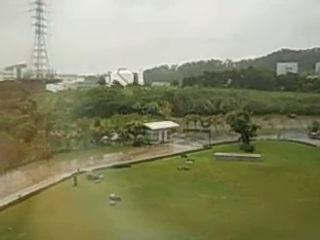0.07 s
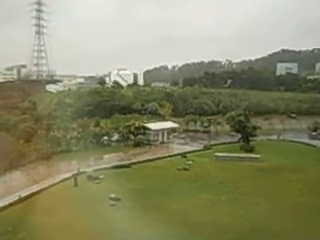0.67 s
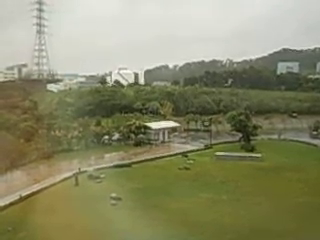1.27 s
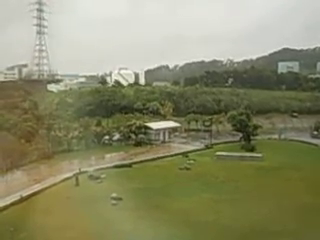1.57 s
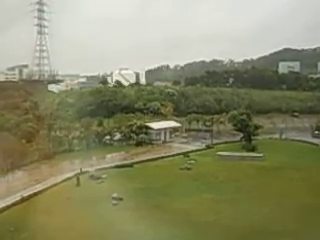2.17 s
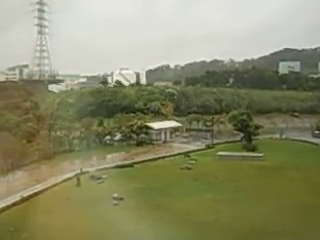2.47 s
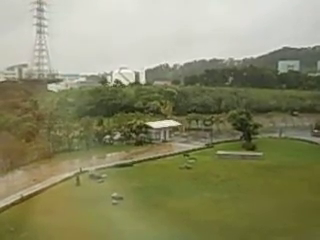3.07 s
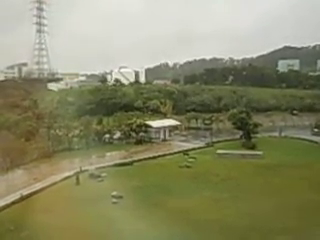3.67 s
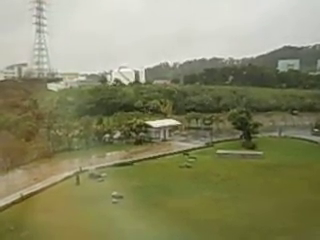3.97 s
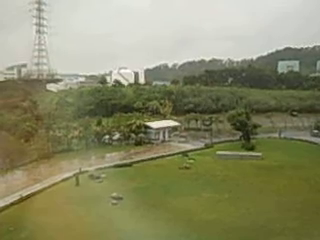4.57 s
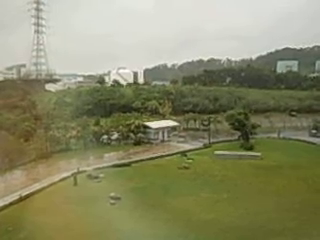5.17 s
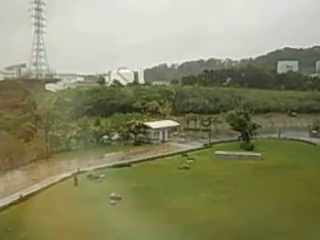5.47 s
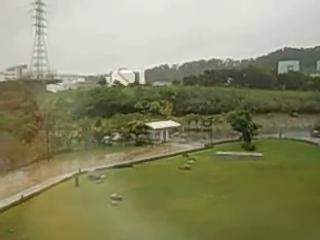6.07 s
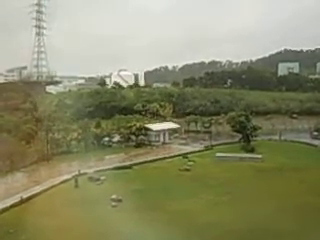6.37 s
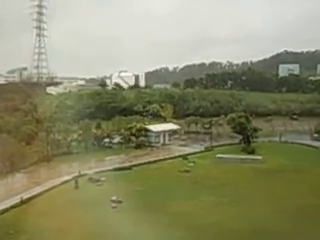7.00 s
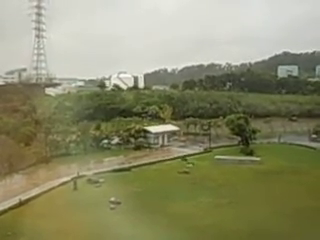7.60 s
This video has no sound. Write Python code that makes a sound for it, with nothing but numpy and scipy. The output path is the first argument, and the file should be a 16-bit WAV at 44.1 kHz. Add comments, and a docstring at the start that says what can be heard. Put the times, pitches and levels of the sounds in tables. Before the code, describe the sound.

Muffled wind and rain wash on outside while stray drops tick against the glass and something small snaps loudly nearby.

```python
"""Behind a window facing a lawn, steady rain and wind are heard through a narrow band, the treble lost above
about 4 kHz. One slowly easing gust drives both the low rush of wind in the trees and the wash and patter of
rain. Stray drops knock on the pane and sill and burst into spray, while a machine whines faintly. Close to the
microphone a small hard part snaps once, and the click overloads the recorder."""
import sys
import numpy as np
from scipy import signal
from scipy.fft import rfft, irfft
from scipy.io import wavfile
from scipy.ndimage import uniform_filter1d

SR = 44100
rng = np.random.default_rng(int(sys.argv[2]) if len(sys.argv) > 2 else 0)


def int16_out(signal):
    """Quantize to a 16-bit WAV file."""
    q = np.round(np.clip(np.atleast_2d(signal).T, -1, 1) * 32767)
    wavfile.write(sys.argv[1], SR, q.astype(np.int16))


N = 345744
T = np.arange(N) / SR
HZ = np.maximum(np.fft.rfftfreq(N, 1 / SR), 1)


def undb(db):
    """Decibels to gain."""
    return 10 ** (np.asarray(db) / 20)


def unit(x):
    """Scale to rms 1."""
    return x / np.sqrt(np.mean(x ** 2))


def colour(x, points):
    """Equalise along a curve of (Hz, dB) points."""
    hz, db = np.transpose(points)
    return irfft(rfft(x) * undb(np.interp(np.log(HZ), np.log(hz), db)), N)


def resonate(x, hz, width_hz):
    """Two-pole resonance, gain 1 at the centre."""
    return signal.lfilter(*signal.iirpeak(hz, hz / width_hz, fs=SR), x)


def cut(x, hz, kind):
    """Two-pole Butterworth low-pass or high-pass."""
    return signal.sosfilt(signal.butter(2, hz, kind, fs=SR, output="sos"), x)


def drift(rate_hz):
    """A smooth random modulator: held steps, slewed twice, with a spread near 1."""
    hold = int(SR / rate_hz)
    steps = rng.standard_normal(N)[np.arange(N) // hold]
    return 1.3 * uniform_filter1d(uniform_filter1d(steps, hold), hold)


def flutter(x, rate_hz, depth_db, count=7):
    """Let each octave band, from 60 Hz up, waver in level on its own."""
    octave = np.clip(np.log2(HZ / 60), 0, count - 1)
    spectrum = rfft(x)
    bands = (irfft(spectrum * np.maximum(1 - abs(octave - k), 0), N) for k in range(count))
    return sum(band * undb(depth_db * drift(rate_hz)) for band in bands)


def add(out, start_s, sound):
    """Mix a short sound in at its start time."""
    start = int(start_s * SR)
    out[start:start + len(sound)] += sound[:N - start]


def window(x):
    """The pane and the room resonate, lifting a few narrow bands of the weather outside."""
    # Each row: centre in Hz, width in Hz, level of the added resonance in dB.
    resonances = [(386, 28, -15.5), (513, 40, -9.5), (603, 25, -9.5), (710, 30, -16.5), (930, 70, -12.5),
                  (1070, 70, -11.5)]
    return x + sum(undb(db) * resonate(x, hz, width) for hz, width, db in resonances)


def wind(gust_db, split_hz=260):
    """Turbulent air in the trees; gusts lift the upper rush more than the rumble beneath."""
    # The wind's tone, dulled by the window. Each row: frequency in Hz, relative level in dB.
    wind_tone = [(20, -56.5), (50, -30.5), (100, -15.5), (160, -3), (230, 0), (310, 2), (440, -9.5),
                 (600, -4.5), (850, -11.5), (1100, -14.5), (1400, -24.5), (3000, -44)]
    turbulence = flutter(rng.standard_normal(N), rate_hz=9, depth_db=1.07)
    air = unit(window(colour(turbulence, wind_tone)))
    rumble = irfft(rfft(air) / (1 + (HZ / split_hz) ** 4), N)
    rush = air - rumble
    swell_db = gust_db - gust_db.mean()
    return undb(gust_db.mean()) * (rumble * undb(0.44 * swell_db) + rush * undb(1.3 * swell_db))


def rain(drops_per_s=500, spread_db=3.5, patter_db=-9, smear_s=0.0023):
    """Countless far drops merge to a wash; nearer ones stand out as a soft patter."""
    # The tone of rain on the grounds. Each row: frequency in Hz, relative level in dB.
    rain_tone = [(200, -17.5), (370, 10.5), (700, 4), (860, 3.5), (1090, 7.5), (1200, 1), (1400, 0),
                 (1650, 2.5), (2080, -3), (2400, 1), (2680, 2), (3050, -2), (3350, -8), (3700, -15.5)]
    impacts = rng.random(N) < drops_per_s / SR
    sizes = undb(spread_db * np.minimum(rng.exponential(size=N), 5))
    # each impact sprays for a moment
    spray_envelope = signal.lfilter([1], [1, -np.exp(-1 / (smear_s * SR))], impacts * sizes)
    patter = unit(spray_envelope * rng.standard_normal(N))
    wash = flutter(rng.standard_normal(N), rate_hz=12, depth_db=0.75)
    return unit(window(colour(wash + undb(patter_db) * patter, rain_tone)))


def machine_whine(wander_hz=2.58, waver_db=1.5):
    """A machine in the building gives off thin tones, slightly unsteady in level and pitch."""
    # Each row: pitch in Hz, level in dB.
    tones = [(317, -57), (538, -52.5), (720, -57.5), (1280, -55.5), (3540, -69)]
    out = np.zeros(N)
    for hz, db in tones:
        gain = undb(db + waver_db * drift(3.6))
        pitch_hz = hz + wander_hz * drift(25)
        out += gain * np.sin(2 * np.pi * np.cumsum(pitch_hz) / SR)
    return out


def light_drops(gust_db, per_s=1.8, above_gust_db=1, spread_db=1.5, count=30):
    """Random extra rows for window_drops; the gust throws these drops harder against the pane."""
    starts = np.cumsum(rng.exponential(size=count)) / per_s
    rows = []
    for start_s, (softness, pitch) in zip(starts, rng.standard_normal((count, 2))):
        if start_s < T[-1]:
            db = gust_db[int(start_s * SR)] + above_gust_db - spread_db * softness
            rows.append((start_s, db, 500 * 2 ** (0.3 * pitch), 0))
    return rows


def window_drops(gust_db, scatter=0.19, thud_width_hz=370):
    """Each drop knocks the pane or sill into a brief ring and bursts into a brighter spray."""
    # The heaviest nearby drops. Each row: start in seconds, peak of the thud in dB,
    # pitch of the thud in Hz, spray level against the thud in dB.
    heavy_drops = [(0.628, -33, 460, 3), (1.467, -35.5, 450, 10), (1.683, -19, 410, -19),
                   (1.939, -31, 319, 9.5), (3.035, -28, 1100, 4), (3.682, -21.5, 850, -11),
                   (4.111, -30, 500, -4), (4.504, -27, 348, -1), (4.582, -16.5, 757, -11.5),
                   (5.044, -33, 510, 3.5), (5.093, -26.5, 644, -15), (5.284, -36, 576, 3.5),
                   (5.371, -26, 896, -9), (5.425, -20, 790, -24), (7.785, -37, 494, 7)]
    # The ring of pane and sill. Each row: centre in Hz, width in Hz, relative level in dB.
    sill_modes = [(360, 49, -4), (417, 170, -1), (611, 100, -2.5), (782, 64, -5), (976, 54, 1),
                  (1124, 64, -3), (1430, 220, -4.5), (1820, 190, 0)]
    # The tone of a bursting drop. Each row: frequency in Hz, relative level in dB.
    spray_tone = [(600, -26.5), (1300, -12.5), (1900, 2.5), (2200, -1), (2450, 4), (2950, 1.5),
                  (3400, -8.5), (3900, -23.5)]
    out, t = np.zeros(N), T[:SR // 10]
    hiss = colour(rng.standard_normal(N), spray_tone)
    for start_s, db, hz, spray_db in heavy_drops + light_drops(gust_db):
        splash_s = 0.0066 * 2 ** ((db + 32) / 20)  # a drop 20 dB louder splashes twice as long
        fade = np.exp(-t / splash_s)
        # one blow, then the water scatters over the surface
        force = (t == 0) + scatter * fade * rng.standard_normal(len(t))
        force = resonate(resonate(force, hz, thud_width_hz), hz, 2 * thud_width_hz)
        thud = sum(undb(mode_db) * resonate(force, mode_hz, width)
                   for mode_hz, width, mode_db in sill_modes)
        spray = fade * np.roll(hiss, int(start_s * SR))[:len(t)]
        tap = thud / abs(thud).max() + undb(spray_db) * spray / abs(spray).max()
        add(out, start_s, undb(db) * tap)
    return out


def click():
    """A small hard part strikes, seats and settles, ringing briefly at each contact."""
    # Each row: start in seconds, gain in dB, brightness as a low-pass cutoff in Hz.
    contacts = [(4.6798, -2.5, 3600), (4.6810, 1.5, 4500), (4.6818, -12, 4490), (4.6857, -7, 1100)]
    # The part's ring. Each row: pitch in Hz, relative level in dB, seconds to fade by 60 dB.
    modes = [(350, -18, 0.0351), (625, -24, 0.027), (1180, -22.5, 0.06), (1354, -10, 0.039),
             (1764, -13, 0.02), (2130, -5.5, 0.017), (2300, -8, 0.014), (2770, -0.5, 0.013),
             (3090, -22.5, 0.054), (3600, -17.5, 0.016)]
    out, t = np.zeros(N), T[:SR // 10]
    ring = sum(undb(db - 60 * t / t60) * np.cos(2 * np.pi * hz * t) for hz, db, t60 in modes)
    for start_s, db, cutoff_hz in contacts:
        add(out, start_s, undb(db) * cut(ring, cutoff_hz, "low"))
    return cut(out, 300, "high")  # too small to radiate bass


def scene(wind_trim_db=-1.21, rain_trim_db=-4, rain_swell=1.25):
    """Wind and rain ride the same gust; whine, drops and click lie on top, in mono."""
    # The strength of the gust. Each row: time in seconds, level in dB.
    gust_curve = [(0.0, -36.5), (0.48, -37.5), (0.78, -36), (1.31, -37), (1.59, -36.5), (2.57, -38.5),
                  (3.75, -39), (4.04, -38), (4.39, -40.5), (4.67, -36.5), (4.91, -39.5), (5.37, -37.5),
                  (5.74, -40.5), (6.86, -40.5), (7.62, -39.5), (7.84, -38.5)]
    gust_db = np.interp(T, *np.transpose(gust_curve))
    shower_db = gust_db.mean() + rain_swell * (gust_db - gust_db.mean())
    air = wind(gust_db + wind_trim_db)
    water = rain() * undb(shower_db + rain_trim_db)
    return (air + water + machine_whine() + window_drops(gust_db) + click())[None]


def record(dry, band_top_hz=3700, ceiling=0.72, recorder_top_hz=15800):
    """The sound is narrowed like a telephone, losing the treble above about 4 kHz; the recorder clips peaks and
    cuts the top."""
    narrow = signal.sosfilt(signal.cheby1(9, .3, band_top_hz, fs=SR, output="sos"), dry)
    clipped = np.clip(narrow, -ceiling, ceiling)
    return signal.sosfilt(signal.ellip(12, .2, 80, recorder_top_hz, fs=SR, output="sos"), clipped)


dry = scene()
out = record(dry)
int16_out(out)
```